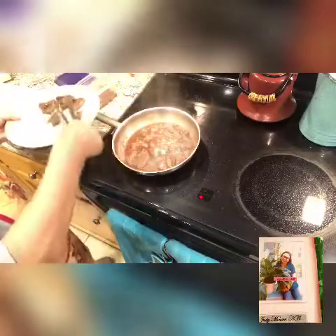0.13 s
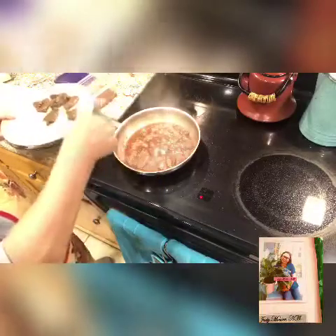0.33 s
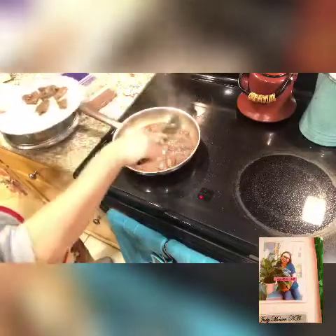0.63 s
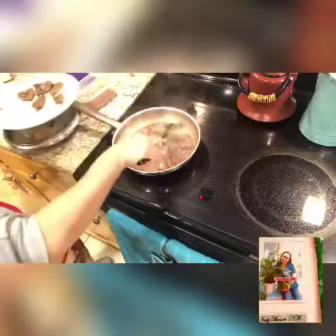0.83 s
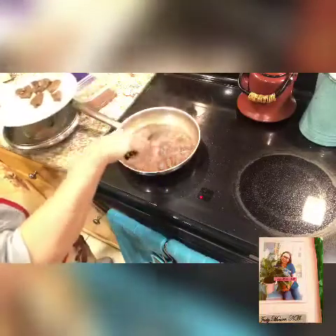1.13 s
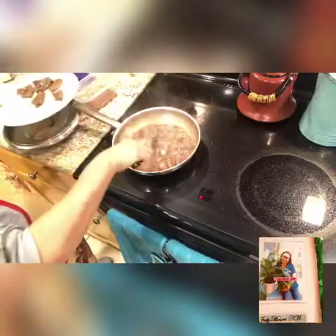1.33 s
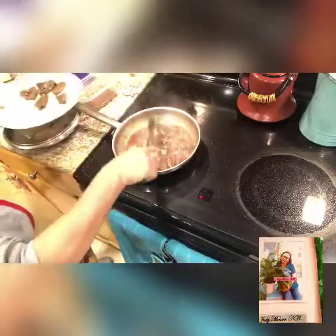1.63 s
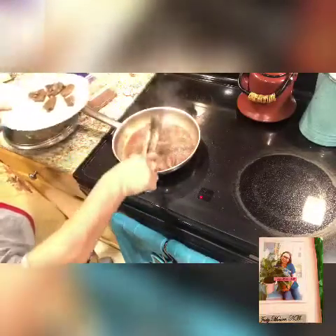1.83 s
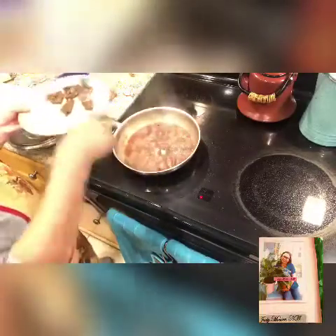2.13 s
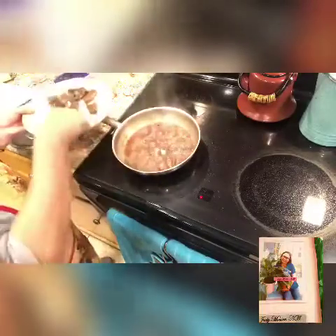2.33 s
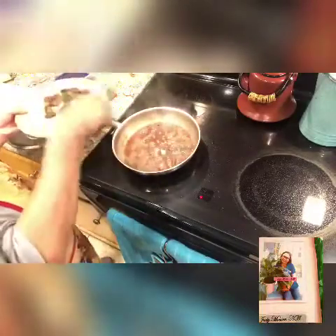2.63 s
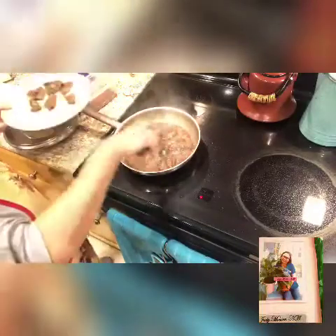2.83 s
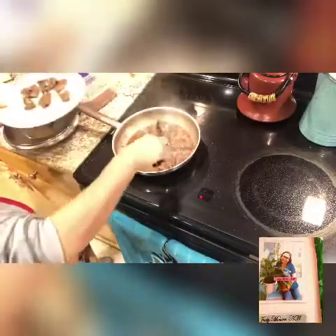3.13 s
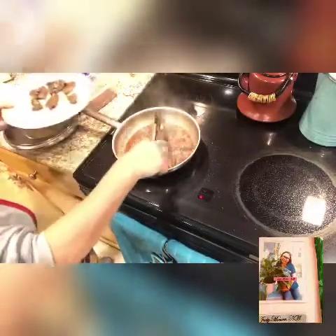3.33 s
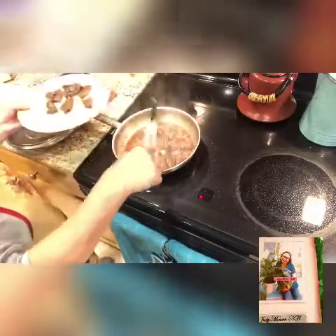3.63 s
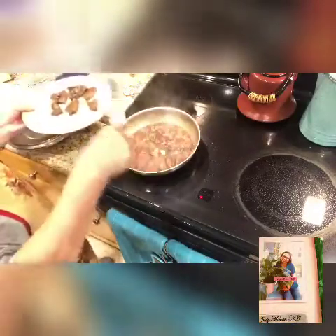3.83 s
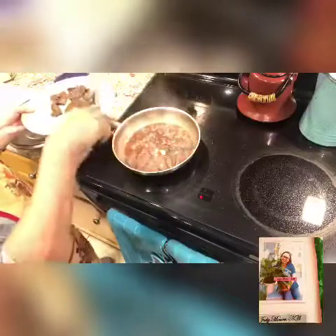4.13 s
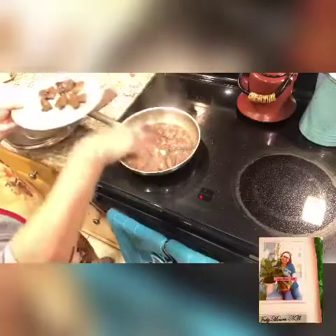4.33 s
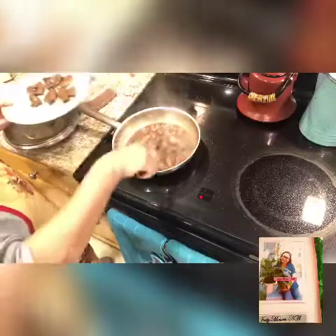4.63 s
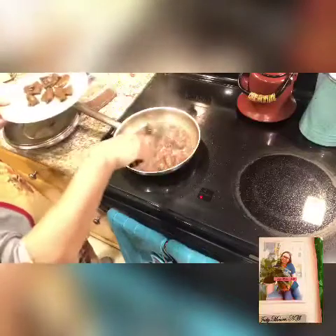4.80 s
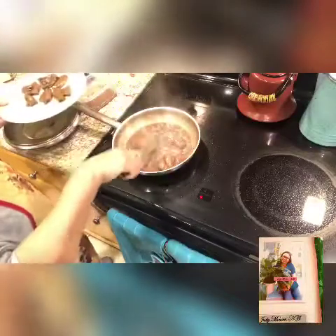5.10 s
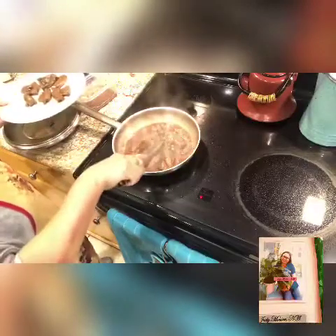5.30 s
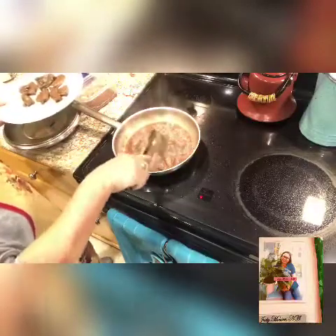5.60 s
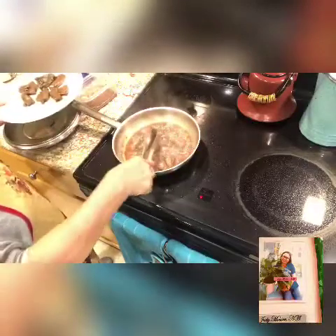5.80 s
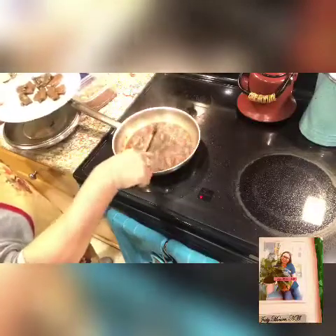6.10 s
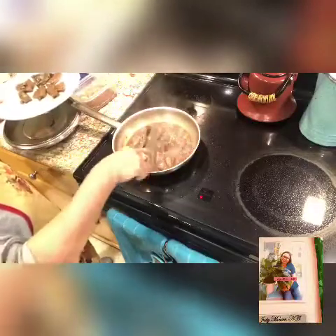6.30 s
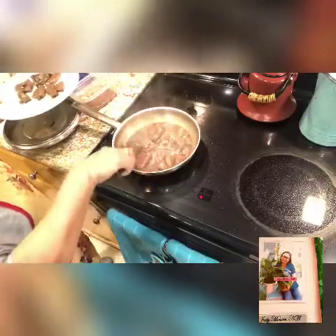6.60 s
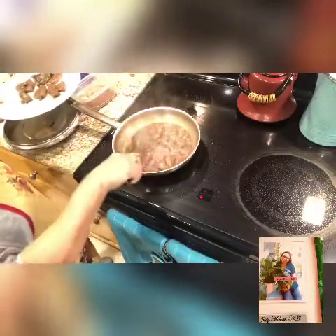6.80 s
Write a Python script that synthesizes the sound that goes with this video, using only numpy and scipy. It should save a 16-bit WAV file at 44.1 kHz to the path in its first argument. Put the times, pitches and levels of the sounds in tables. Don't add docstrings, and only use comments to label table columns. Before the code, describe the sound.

One bright plate clink, then sharp spaced clacks of steel tongs in a frying pan, with soft hiss and fan in a lively kitchen.

```python
import sys
import numpy as np
from scipy import signal
from scipy.fft import irfft
from scipy.io import wavfile

SR = 44100
rng = np.random.default_rng(int(sys.argv[2]) if len(sys.argv) > 2 else 0)


def generate_wav(signal):
    frames = np.transpose(np.atleast_2d(signal))
    scaled = np.clip(frames, -1, 1) * 32767
    pcm = np.round(scaled).astype(np.int16)
    wavfile.write(sys.argv[1], SR, pcm)


def level_to_linear(level):
    exponent = np.asarray(level, float) / 20
    return 10 ** exponent


N = 306495


def rms_one(x):
    return x / np.sqrt(np.mean(x ** 2) + 1e-20)


def at_hz(points, hz, axis=1):
    points = np.array(points)
    return np.interp(np.log(hz), np.log(points[:, 0]), points[:, axis])


def highpass(x, order, hz):
    return signal.sosfilt(signal.butter(order, hz, "high", fs=SR, output="sos"), x)


def drift(rate):
    r = np.exp(-80 * np.pi * rate / SR)
    noise = rng.standard_normal(N // 40 + 2002)
    slow = signal.lfilter([1], [1, -2 * r, r * r], noise)[2000:]
    return np.interp(np.arange(N) / 40, np.arange(len(slow)), rms_one(slow))


def ring(clicks, hz, t60):
    r = level_to_linear(-60 / (max(t60, 1e-3) * SR))
    w = 2 * np.pi * hz / SR
    return signal.lfilter([0, np.sin(w)], [1, -2 * r * np.cos(w), r * r], clicks + 1e-18)


def bands(white, count=3):
    edges = 26 * 2 ** np.arange(0, 9.6, 1 / count)
    for k, (low, high) in enumerate(zip(edges, edges[1:])):
        band = signal.butter(2, [low, high], "band", fs=SR, output="sos")
        yield np.sqrt(low * high), signal.sosfilt(band, white[k % len(white)])


def add(track, s, peak_db, blow):
    i = round(s * SR)
    track[i:i + len(blow)] += (level_to_linear(peak_db) * blow / np.abs(blow).max())[:N - i]


# f/Hz, level/dB, T60/s
ROOM_ECHO = [(161, 2, 0.31), (537, 4.5, 0.41), (1530, 2, 0.35), (3660, 1.5, 0.33), (6900, -1.5, 0.36),
             (11700, -1, 0.22)]


def kitchen(x, wet_db, first_s):
    t = np.arange(22050) / SR
    tail = 0
    for hz, band in bands(rng.standard_normal((2, len(t))), count=2):
        decay_db = at_hz(ROOM_ECHO, hz) - 60 * t / at_hz(ROOM_ECHO, hz, axis=2)
        tail = tail + level_to_linear(decay_db) * band
    tail *= np.clip(t / first_s, 0, 1) ** 2
    return level_to_linear(wet_db) * signal.fftconvolve(x, tail / np.sqrt(np.sum(tail ** 2)))[:N]


# f/Hz, level per Hz/dB
FAN_AIR = [(15, -36), (25, -18), (43, 4), (75, -6), (113, -5.5), (248, -8), (348, -6.5), (439, -14),
           (701, -6.5), (886, -13), (1100, -6), (1570, -4), (1980, -15), (2970, -8.5), (4000, -39),
           (5200, -45), (8800, -120)]
# f/Hz, width/Hz, level/dB
FAN_HUMPS = [
    (121.3, 8.8, -71),
    (337, 5.1, -77.5),
    (906, 91, -65.5),
]


def fan():
    air = 0
    for hz, band in bands(rng.standard_normal((2, N))):
        if hz < 3500:
            air = air + level_to_linear(at_hz(FAN_AIR, hz) + 1.5 * drift(8.7)) * band
    tones = 0
    for hz, width_hz, level_db in FAN_HUMPS:
        t60 = np.log(1000) / np.pi / width_hz
        tones = tones + level_to_linear(level_db) * rms_one(ring(rng.standard_normal(N), hz, t60))
    return level_to_linear(-56.5 - 2.5) * rms_one(air) + tones


# t/s, length/s, level/dB
MOTOR_PULLS = [
    (5.73, 0.27, -69),
    (6.12, 0.41, -66.5),
]


def motor():
    t, fade_s = np.arange(N) / SR, 0.03
    pull = 0
    for s, length_s, level_db in MOTOR_PULLS:
        pull = pull + level_to_linear(level_db) * np.clip(np.minimum(t - s, s + length_s - t) / fade_s, 0, 1)
    hz = 275 + 27 * (t - MOTOR_PULLS[0][0])
    return np.sqrt(2) * pull * np.sin(2 * np.pi * np.cumsum(hz) / SR)


def random_catches(shape, per_s, spread_db, most):
    hits = rng.random(shape) < per_s / SR
    level_db = spread_db * np.minimum(rng.exponential(1, shape), most)
    return hits * level_to_linear(level_db) * rng.choice([-1, 1], shape)


# f/Hz, level per Hz/dB
OIL_HISS = [(1060, -31), (1800, 0), (1970, -13), (2670, 7), (2980, -26), (3290, -3.5), (4880, -4.5),
            (6410, -5), (10200, -12.5), (14600, -8.5), (16000, -10)]
# t/s, half length/s, rise/dB
FOOD_STIRS = [
    (0.05, 0.36, 1),
    (1.392, 0.35, 1.5),
    (2.897, 0.49, 1.5),
    (4.914, 0.52, 3),
]


def sizzle():
    grains = random_catches((2, N), per_s=1800, spread_db=7.5, most=5)
    source = rng.standard_normal((2, N)) + 0.51 * rms_one(grains)
    together = drift(40)
    hiss = 0
    for hz, band in bands(source):
        if hz > 1800:
            hiss = hiss + level_to_linear(at_hz(OIL_HISS, hz) + 1.47 * together + 0.79 * drift(9.1)) * band
    t = np.arange(N) / SR
    stirred_db = sum(rise_db * np.exp(-((t - s) / half_s) ** 2) for s, half_s, rise_db in FOOD_STIRS)
    return level_to_linear(-60.5 + stirred_db) * rms_one(hiss)


# t/s, peak
# level/dB, f/Hz
LIGHT_TICKS = [(0.3783, -42, 6300), (0.756, -24.5, 14800), (0.8415, -38, 13800), (0.7685, -41, 7500),
               (1.2744, -36, 5740), (1.7338, -38, 14400), (1.842, -36, 9900), (2.0574, -40, 5700),
               (2.1174, -42, 6900), (2.243, -37, 10600), (2.3213, -40, 6640), (2.4194, -41, 11000),
               (2.461, -41, 7440), (2.6394, -33, 14800), (2.648, -39, 6160), (3.865, -38, 12300),
               (4.192, -40, 14800), (4.3478, -39, 6430), (5.3263, -42, 11000), (5.7063, -41, 6000),
               (5.9124, -21, 14800), (6.4498, -42, 5340)]
# t/s, peak level/dB, f/Hz, T60/s
DULL_KNOCKS = [
    (0.821, -39, 2700, 0.01),
    (1.3269, -45, 1680, 0.08),
    (4.7471, -49, 3370, 0.018),
    (4.9945, -37, 2090, 0.0099),
    (5.4261, -37, 2880, 0.0091),
    (5.909, -33.5, 4400, 0.0066),
]


def ticks():
    out = np.zeros(N)
    for s, peak_db, hz, t60 in [(*tick, 0.003) for tick in LIGHT_TICKS] + DULL_KNOCKS:
        snap = rng.standard_normal(1024) * level_to_linear(-60 * np.arange(1024) / SR / 0.0021)
        edge = level_to_linear(3) * (hz / 8000) ** 1.2 * np.diff(snap, prepend=0)
        add(out, s, peak_db, edge + ring(snap, hz, t60))
    return out


def crowd(count, t60_s):
    t = np.arange(2048) / SR
    hz = np.linspace(420, 16400, count) + rng.uniform(-23.0, 7, count)
    t60 = np.clip(t60_s * (3000 / hz) ** 0.22, .004, .04)[:, None]
    onset = np.minimum(t / 0.00022, 1)
    return hz, np.exp(2j * np.pi * hz[:, None] * t) * level_to_linear(-60 * t / t60) * onset


def strike(modes, level_db):
    phases = np.exp(2j * np.pi * rng.random(len(modes)))
    return np.real(level_to_linear(level_db) * phases @ modes)


def pulse(level_db):
    click = np.roll(irfft(level_to_linear(level_db)), 64) * np.hanning(1024)[512:]
    return click / np.sqrt(np.sum(click ** 2))


# f/Hz, level/dB, T60/s
ARM_MODES = [(2458, -9.5, 0.077), (2996, -0.5, 0.052), (3180, -20, 0.044), (3397, -3, 0.028),
             (4110, -13.5, 0.066), (4240, -23, 0.074), (5450, -6, 0.057), (6030, -9.5, 0.053),
             (6160, -9, 0.082), (6330, -12, 0.04), (8900, -14, .05), (10110, -14, 0.043)]


def arms(clicks, spread_db):
    out = 0
    for k, (hz, level_db, t60) in enumerate(ARM_MODES):
        strength = level_to_linear(level_db + rng.normal(0, spread_db)) * (-1) ** k
        out = out + strength * ring(clicks, hz, min(t60, .1))
    return out


# f/Hz, level per Hz/dB
DRAG_COLOUR = [(290, -57), (500, -15), (843, -37), (1000, -9), (2010, -13.5), (2430, -1.5), (2810, -5.5),
               (3250, -8), (3920, -3), (8700, -8), (12000, -19), (14900, -16), (16000, -37)]
# start t/s, hardest t/s, end t/s, level/dB, brightness per octave/dB
TIP_DRAGS = [
    (0.787, 0.816, 0.98, -48.5, 3.5),
    (1.247, 1.268, 1.5, -48, -5.5),
    (2.95, 2.969, 2.98, -41.5, -5.5),
    (4.552, 4.608, 4.626, -32, 1.2),
    (5.05, 5.07, 5.54, -55, 0.1),
]


def scrapes():
    out, hz = np.zeros(N), np.linspace(1, SR / 2, 257)
    catches = random_catches(N, per_s=4000, spread_db=2.0, most=4)
    lift_s = 0.0063
    for start, hardest, end, level_db, tilt_db in TIP_DRAGS:
        edge_db = level_db - 11
        times = [start - lift_s, start, hardest, end, end + lift_s]
        drag_db = np.interp(np.arange(N) / SR, times, [-95, edge_db, level_db, edge_db, -95])
        click = pulse(at_hz(DRAG_COLOUR, hz) + tilt_db * np.log2(hz / 4000))
        rough = rms_one(signal.fftconvolve(catches, click)[:N] + level_to_linear(-22.5) * arms(catches, spread_db=2.0))
        out += level_to_linear(drag_db - 3.5) * rough
    return out


# t/s, peak level/dB
PLATE_CLINK = [
    (0.086, -8.5),
]
PLATE_PITCHES = [738, 1338, 1365, 1472, 1593, 1664, 1830, 2290, 2672, 2760, 3330, 3580, 5500, 7084]
# level/dB, T60/s
PLATE_DECAYS = [(-11.5, 0.18), (6.5, .05), (6, 0.049), (2.5, 0.034), (-2, 0.034), (-9, .05), (-6.5, .05),
                (-10, 0.076), (8, 0.036), (-1.5, .04), (-4.5, .03), (-0.5, 0.098), (-8, .03), (2.5, 0.014)]


def plate():
    out, contact, clear = np.zeros(N), np.zeros(16384), np.zeros(16384)
    contact[[0, 34, 88]] = [.2, .5, 1]
    for k, (mode_hz, (level_db, t60)) in enumerate(zip(PLATE_PITCHES, PLATE_DECAYS)):
        clear += level_to_linear(level_db) * (-1) ** k * ring(contact, mode_hz, t60)
    hz, modes = crowd(count=300, t60_s=0.081)
    crack = [(1000, -31), (2500, -12), (4500, -19), (6000, -10.5), (8500, -28), (13500, -22), (16000, -29)]
    clear[40:2088] += strike(modes, at_hz(crack, hz))
    s, peak_db = PLATE_CLINK[0]
    add(out, s - .0008, peak_db, highpass(clear, 4, 600))
    return out


# f/Hz, level/dB, T60/s
PAN_MODES = [
    (159, 7, 0.096),
    (227, -3, 0.081),
    (284, 7, 0.072),
    (480, -1, 0.14),
]


def thump():
    push = np.zeros(8192)
    push[:88] = np.hanning(88)
    push = highpass(push, 2, 110)
    return sum(level_to_linear(level_db + rng.normal(0, 2.5)) * ring(push, hz, t60) for hz, level_db, t60 in PAN_MODES)


def rattle(modes, level_db, length_s, per_s):
    out = np.zeros(4096)
    at_s = np.cumsum(rng.exponential(1, 24)) / per_s
    force = (rng.random(24) + 0.59) * np.exp(-(at_s / max(length_s, 1e-3)) ** 2)
    starts = np.minimum(at_s * SR, 2047).astype(int)
    for i, f in zip([0, *starts], [1.4, *force]):
        out[i:i + 2048] += f * strike(modes, level_db)
    return out


# f/Hz, level per Hz/dB
CLOSING_COLOUR = [(240, -45), (400, -12.5), (679, -21.5), (1030, -9.5), (2050, -14), (3430, -1.5),
                  (4460, -8.5), (4830, -10.5), (6390, -3), (7820, -14.5), (8990, -6), (10500, -15.5),
                  (13900, -14), (15700, -19), (16500, -40)]
# f/Hz, level per Hz/dB
OPENING_COLOUR = [(240, -45), (400, -28.5), (669, -21.5), (1020, -5.5), (1960, -17), (2430, -7.5),
                  (2760, -14), (3170, -1.5), (3820, -6.5), (4190, -4), (4610, -2), (6090, -2.5),
                  (11700, -12.5), (14300, -14.5), (16500, -45)]
# t/s, peak level/dB, loudest ring f/Hz, rattle/s, weight on the pan/dB
JAWS_CLOSE = [
    (1.1842, -14, 5900, 0.013, 1),
    (2.8571, -12, 3600, 0.0085, -2),
    (5.158, -16.5, 2870, 0.006, 3),
    (5.4327, -33, 7160, 0.0092, 5.5),
    (6.6198, -11, 4350, 0.0018, -12.5),
    (6.6239, -14.5, 4250, 0.012, -2.5),
]
# t/s, peak level/dB, loudest ring f/Hz, rattle/s, weight on the pan/dB
JAWS_OPEN = [
    (0.7561, -34, 2840, 0.002, 6),
    (0.838, -34.5, 6000, 0.0063, 5),
    (1.3712, -13.5, 2420, 0.0037, 2),
    (3.035, -7.5, 4110, 0.0071, -0.7),
    (4.5341, -5.5, 3250, 0.0064, -1.5),
    (5.9109, -29, 6600, 0.0036, -4),
    (6.7245, -22, 2530, 0.0057, 0.5),
]
# t/s, peak level/dB
PAN_NUDGES = [
    (5.906, -65),
    (6.191, -51.5),
]


def tongs():
    near, around = np.zeros(N), np.zeros(N)
    hz, modes = crowd(count=300, t60_s=0.023)
    even_hz = np.linspace(1, SR / 2, 257)
    treble = np.clip(np.log2(even_hz / 4500), 0, 1)
    bass = np.clip(np.log2(2500 / even_hz), 0, 1)
    contact = np.eye(1, 4096, 20)[0]
    clacks = [(*c, CLOSING_COLOUR) for c in JAWS_CLOSE] + [(*c, OPENING_COLOUR) for c in JAWS_OPEN]
    for s, peak_db, loud_hz, rattle_s, weight_db, colour in clacks:
        treble_db = 2.5 - 0.32 * weight_db
        colour_db = at_hz(colour, even_hz) + treble_db * treble + weight_db * bass
        click = pulse(colour_db)
        steel = rattle(modes, np.interp(hz, even_hz, colour_db), rattle_s, per_s=1000)
        steel += level_to_linear(13.5) * ring(contact, loud_hz, 0.028)
        steel += level_to_linear(3.5) * arms(contact, spread_db=3.5)
        steel[:448] += level_to_linear(30) * click[64:]
        add(near, s, peak_db, steel)
        add(around, s, peak_db - 2.5, steel)
        click = click * np.sqrt(np.sum(steel ** 2)) / np.abs(steel).max()
        add(around, s, peak_db - 3.5 + 20 * np.log10(np.abs(click).max()), click)
        thump_db = -26.5 - 0.33 * (peak_db + 15) + 0.14 * weight_db
        add(near, s + 0.0031, peak_db + thump_db, thump())
    for s, peak_db in PAN_NUDGES:
        add(near, s, peak_db, thump())
    return near, around


def scene():
    clink, light = plate(), ticks() + scrapes()
    steel, around = tongs()
    low = signal.sosfilt(signal.butter(2, 400, fs=SR, output="sos"), steel)
    to_walls = level_to_linear(-2) * clink + around + level_to_linear(-1.5) * light + level_to_linear(-1.5) * low
    room = kitchen(to_walls, wet_db=-8.0, first_s=0.0019)
    soft = room + sizzle() + fan() + motor()
    soft = signal.sosfilt(signal.cheby2(14, 60, 16150, fs=SR, output="sos"), soft)
    return (clink + steel + light + soft)[None]


# f/Hz, width/Hz, depth 0-1
HOUSING_DIPS = [
    (4850, 360, 0.5),
    (10600, 340, 0.44),
]


def housing(x):
    for hz, width_hz, depth in HOUSING_DIPS:
        peak = signal.lfilter(*signal.iirpeak(hz, hz / width_hz, fs=SR), x)
        x = x - np.clip(depth, 0, 1) * peak
    return x


def top_cut(x):
    return signal.sosfilt(signal.butter(12, 16850, fs=SR, output="sos"), x)


def record(dry):
    thin = highpass(0.96 * np.tanh(dry / 0.8), 4, 38)
    thin = housing(thin)
    thin = signal.sosfilt(signal.cheby2(10, 60, 17100, fs=SR, output="sos"), thin)
    return top_cut(thin)


dry = scene()
out = record(dry)
generate_wav(out)
```